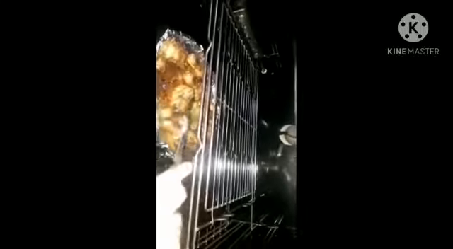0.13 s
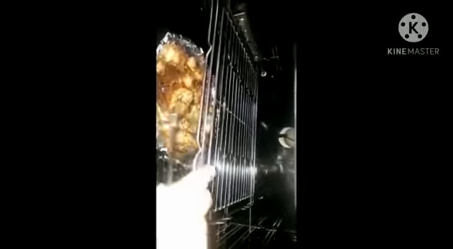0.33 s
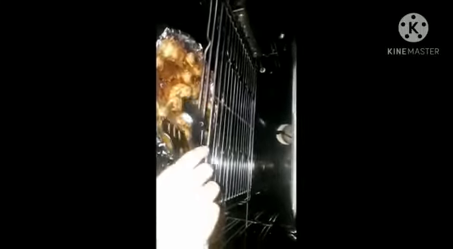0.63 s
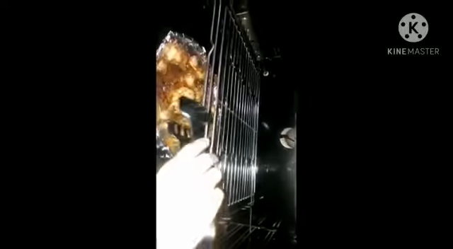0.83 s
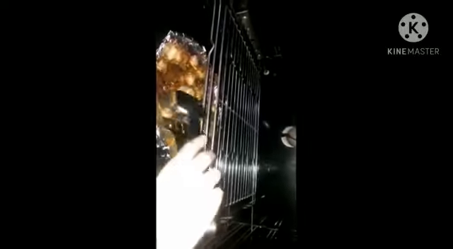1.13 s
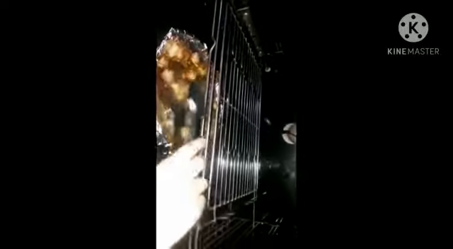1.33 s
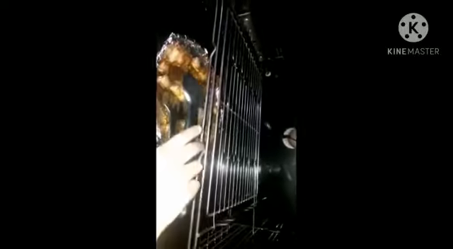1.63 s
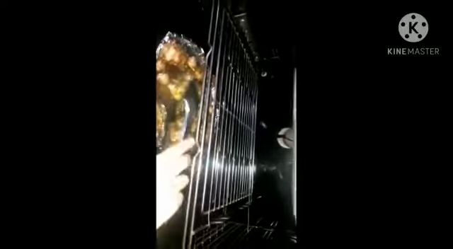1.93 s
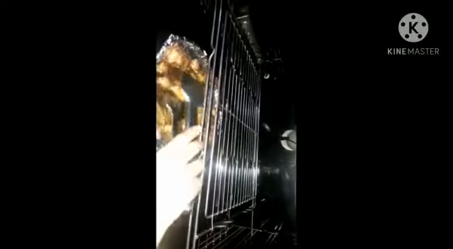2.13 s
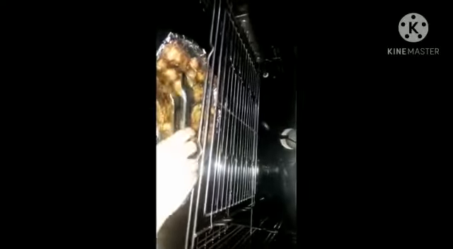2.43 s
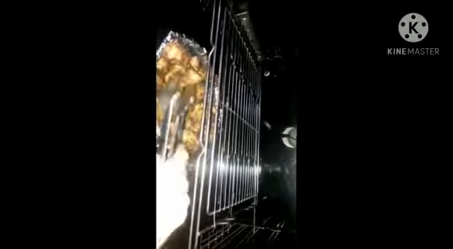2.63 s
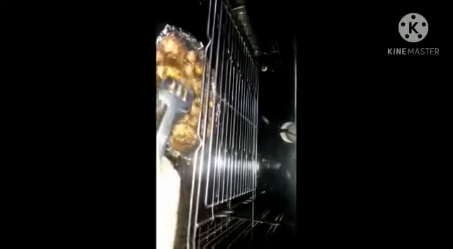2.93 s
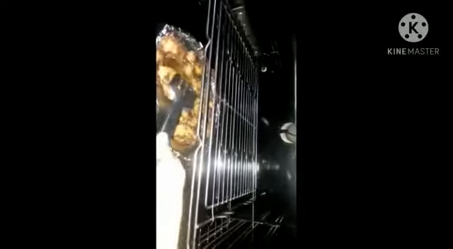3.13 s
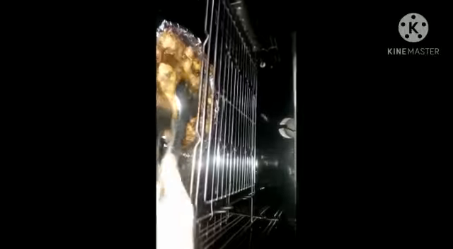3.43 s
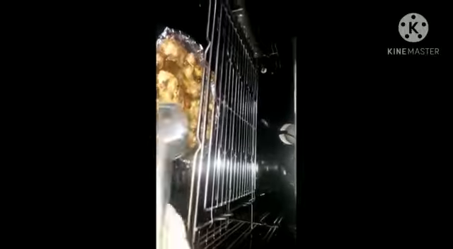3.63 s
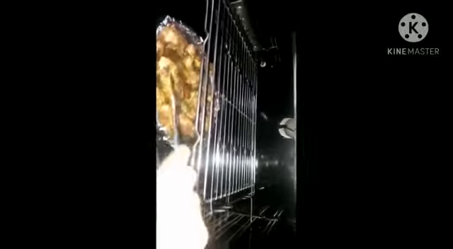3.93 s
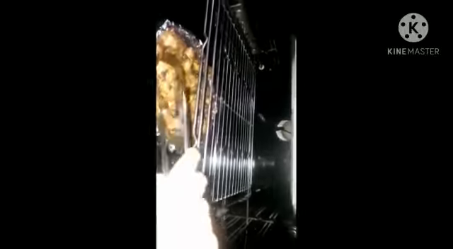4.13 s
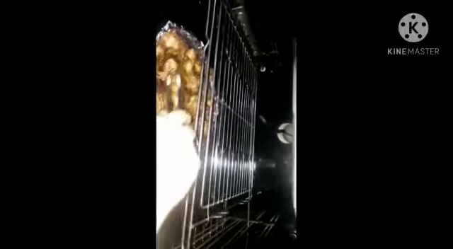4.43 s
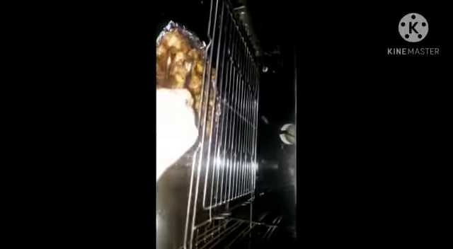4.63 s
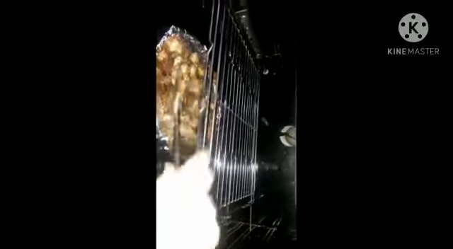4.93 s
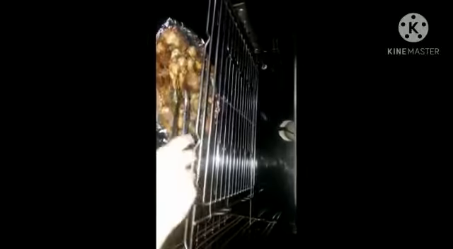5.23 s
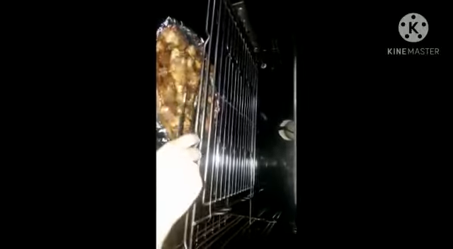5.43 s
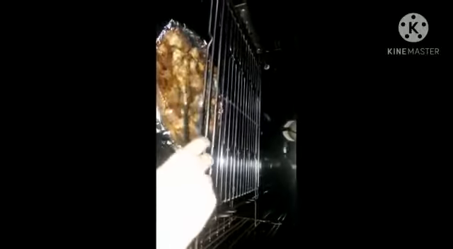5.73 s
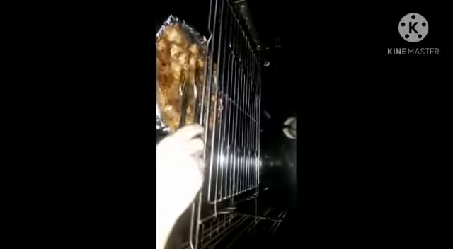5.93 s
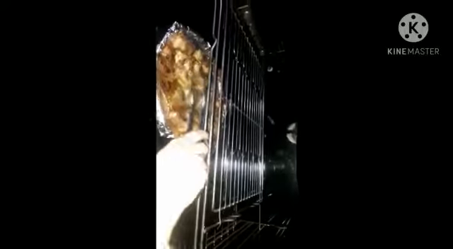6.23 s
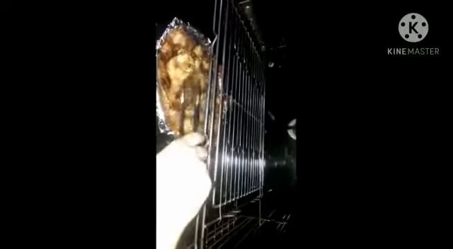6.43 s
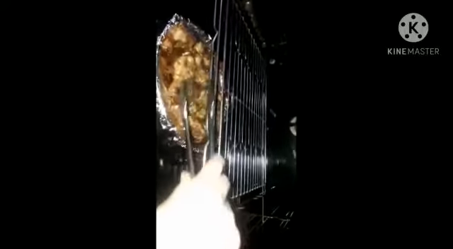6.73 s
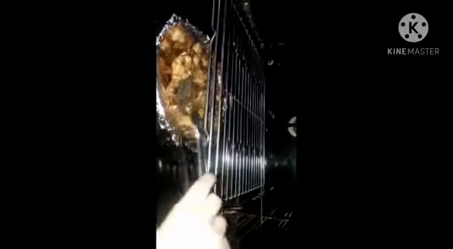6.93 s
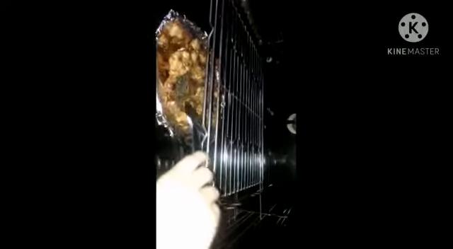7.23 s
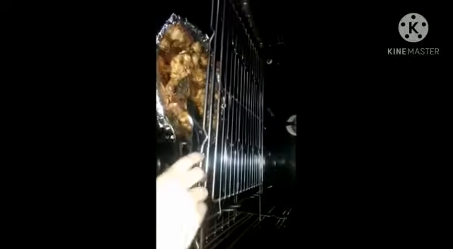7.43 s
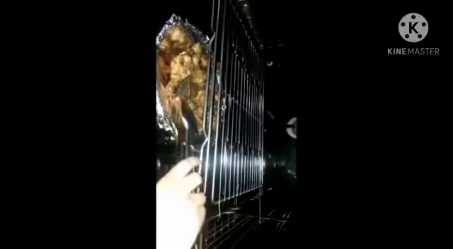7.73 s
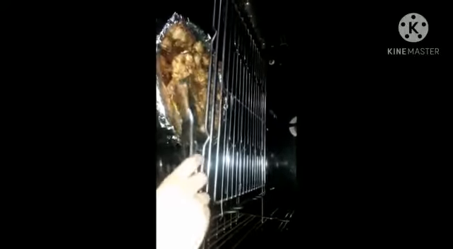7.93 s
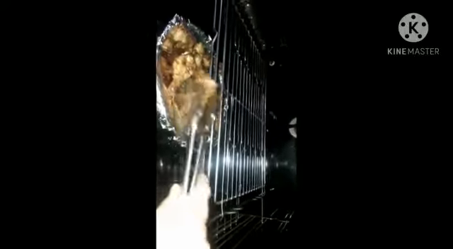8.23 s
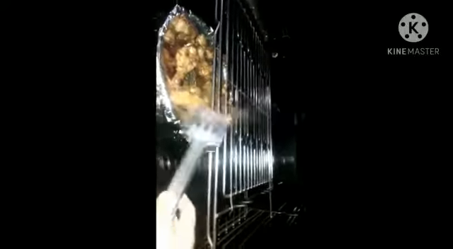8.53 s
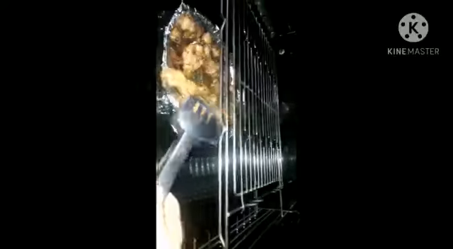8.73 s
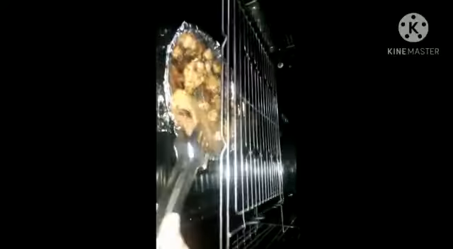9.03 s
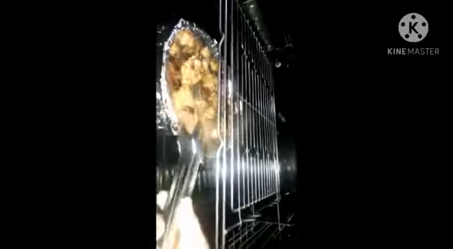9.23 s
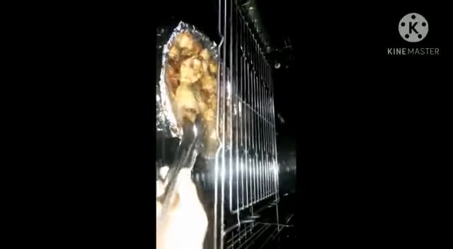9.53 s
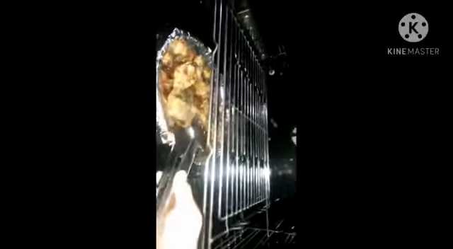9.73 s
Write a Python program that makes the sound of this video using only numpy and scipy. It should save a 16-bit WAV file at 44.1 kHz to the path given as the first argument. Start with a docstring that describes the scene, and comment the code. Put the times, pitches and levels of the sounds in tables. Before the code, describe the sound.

Steel tongs work in a foil tray on an oven rack, each strike mixing a foil crunch, a clink and a hollow boom. Light ticks open, then a cluster of clinks runs from 0.6 to 1.2 seconds, with a bright ringing hit at 1.4. Chicken pieces land with soft thumps around 2, 2.6 and 3.3 seconds. The loudest crash comes at 3.8, as the rack bangs the oven wall and the steel rings. The tray rumbles briefly, knocks at 4.7, and things go quiet until about 5.5. Ringing clinks return from 5.8 to 6.3 and near 7, followed by gritty scraping and another clink at 7.6. A sharp foil crash and clink come around 8.5, then lighter scrapes and ticks until nearly 10 seconds. The oven adds a short, dull echo, and a very faint kitchen hum lies behind.

```python
"""Tongs in a foil tray

Steel tongs turn baked chicken in a foil tray that stands on an oven rack. Each blow is a crash of foil,
a clink of the tongs and a slower boom of tray and rack; some leave tongs, bars or the oven wall ringing.
Between blows the tips scrape over the foil, pieces land with a thump and the tray shifts on the bars.
The oven adds a short echo, and a quiet kitchen hums behind."""
import sys
import numpy as np
from scipy import signal
from scipy.fft import rfft, irfft
from scipy.io import wavfile
from scipy.ndimage import uniform_filter1d

SR = 44100
rng = np.random.default_rng(int(sys.argv[2]) if len(sys.argv) > 2 else 0)


def waveform_to_disk(signal):
    """Save audio, clipped to [-1, 1], as 16-bit WAV at the path in sys.argv[1]."""
    frames = np.transpose(np.atleast_2d(signal))
    scaled = np.clip(frames, -1, 1) * 32767
    samples = np.round(scaled).astype(np.int16)
    wavfile.write(sys.argv[1], SR, samples)


N = 435266

# Blows of the tongs: t/s, crash level/dB, relative treble/dB, crash t60/s, clink level/dB, boom level/dB
BLOWS = [(0.038, -41.5, -15, 0.08, -48.5, -54), (0.0642, -43.5, -2, 0.1, -67, -72),
         (0.1336, -47, -1, 0.2, -57, -57), (0.1815, -40, -12, 0.19, -60, -87),
         (0.585, -35, -2, 0.38, -32.5, -37), (0.6656, -38.5, 1, 0.33, -34, -39),
         (0.7778, -34, -4, 0.42, -38, -35.5), (0.875, -42.5, 6.5, 0.21, -38.5, -43),
         (1.004, -50, -28, 0.84, -46.5, -44), (1.048, -48, 6, 0.12, -55, -74),
         (1.0608, -25.5, -9, 0.12, -44, -42), (1.118, -43, 0, 0.08, -55, -70),
         (1.2154, -37.5, 2, 0.16, -42, -66), (1.369, -42.5, 0, 0.2, -64, -53),
         (1.3954, -28.5, 6, 0.5, -21, -31), (1.604, -45, 7, 0.58, -58, -46.5),
         (1.8216, -36, 6.5, 0.33, -59.5, -41.5), (1.9375, -44, -1, 0.4, -64, -38.5),
         (2.097, -35, -1, 0.3, -54, -46.5), (2.2797, -36, 1.5, 0.24, -34.5, -37.5),
         (2.5344, -62, 16.5, 0.083, -68, -78), (2.652, -53.5, -18, 0.36, -70, -50.5),
         (2.845, -51, 15, 0.11, -54, -81), (2.917, -40.5, -25, 0.08, -77, -51),
         (3.052, -53.5, -3, 0.78, -69, -61), (3.1577, -49, -6, 0.26, -53, -70),
         (3.311, -51.5, 1.5, 0.55, -53, -89), (3.3557, -27.5, 7.5, 0.22, -45, -39.5),
         (3.4183, -25, -14, 0.088, -41, -37.5), (3.6158, -35, 5, 0.11, -62, -80),
         (3.655, -49, -4, 0.086, -59, -80), (3.7834, -14, 0.5, 0.47, -17.5, -23),
         (3.892, -31, 6, 0.27, -26.5, -27.5), (3.9634, -37.5, 13.5, 0.29, -48, -83),
         (4.0502, -62.5, 28, 0.097, -60.5, -63), (4.456, -56.5, 8.5, 0.44, -75.5, -63),
         (4.599, -51, -7, 0.07, -70, -77), (4.66, -47, 8, 0.086, -72, -68.5),
         (4.7185, -42.5, -15, 0.17, -68, -39), (4.73, -34.5, 4, 0.26, -55, -46.5),
         (4.873, -62.5, 7.5, 0.083, -77.5, -79.5), (5.405, -57.5, -6, 0.12, -81, -69.5),
         (5.604, -54.5, 13.5, 0.18, -75.5, -57.5), (5.669, -44.5, -10, 0.057, -68.5, -85),
         (5.7891, -30, 12, 0.26, -24, -32.5), (5.9983, -41.5, 15, 0.27, -35, -41.5),
         (6.169, -49.5, 17.5, 0.59, -41, -50.5), (6.322, -35, -0.5, 0.23, -35, -40),
         (6.47, -47, -9, 0.39, -73, -60), (6.404, -53.5, 10.5, 0.14, -53, -75),
         (6.546, -51, 14, 0.13, -68, -76), (6.579, -44, -11.5, 0.14, -63, -51.5),
         (6.6308, -44.5, -7, 0.13, -66, -77.5), (6.9511, -27, 3.5, 0.51, -33, -27.5),
         (7.0462, -26.5, -12, 0.036, -39, -57), (7.1034, -44, 2, 0.13, -48, -52),
         (7.1268, -45.5, 15, 0.13, -45, -70), (7.1548, -50, 14, 0.08, -50, -70),
         (7.1876, -46, 14, 0.048, -53, -52.5), (7.4877, -36.5, 1, 0.25, -46, -74),
         (7.588, -34.5, 9, 0.032, -49, -84), (7.5895, -43, 2, 0.095, -28.5, -44),
         (8.0003, -41.5, -3.5, 0.092, -66, -75.5), (8.4454, -42.5, -7, 0.14, -68.5, -49.5),
         (8.4957, -20, 1, 0.066, -29.5, -91), (8.609, -29.5, 11, 0.025, -68, -73.5),
         (8.609, -35, 7, 0.35, -38.5, -38), (9.24, -43.5, -18.5, 0.077, -69.5, -67.5),
         (9.251, -38, -15, 0.07, -74, -60), (9.341, -57, -14, 0.44, -55, -76),
         (9.854, -49, 6, 0.26, -61, -65)]
# Spectrum of crashing foil: f/Hz, relative level/dB
CRASH_SPECTRUM = [(530, -36.5), (1150, -16), (1990, -6), (2330, -4.5), (3150, -5), (3880, -4), (4380, -6),
                  (7390, 3.5), (15300, -18), (16500, -37)]
def foil_crashes():
    """Impact noise: struck foil gives a sharp tick, then a broad band that decays faster in the treble."""
    at, db, treble_db, t60, *_ = np.transpose(BLOWS)
    t60 = np.maximum(t60, 0.03)
    treble_t60 = 0.74 * t60
    rise_share = 0.0081  # a longer crash also swells more slowly
    foil = coloured(crease_noise(grain_db=0.5, per_s=410), CRASH_SPECTRUM)
    low, high = map(unit_rms, split(patchy(foil, depth_db=4.26, size=1024), hz=4400))
    body = low * envelope(at, db, rise_share * t60, t60, curve=0.94)
    treble = high * envelope(at, db + treble_db, rise_share * treble_t60, treble_t60, curve=0.8)
    tick = foil * envelope(at, db - 4.5, rise_s=0.0002, t60=0.022)
    return body + treble + tick


# Modes of one arm of the tongs: f/Hz, relative level/dB, free t60/s
TONG_MODES = [(2310, -6, 0.096), (3790, -10.5, 0.19), (4635, -4.5, 0.11), (4970, -10, 0.19),
              (5410, -9, 0.071), (6970, -8, 0.17), (7550, -8, 0.23), (7980, -13, 0.11), (8480, -8.5, 0.19),
              (10800, -15, 0.08), (11540, -15, 0.076)]
# Blows that also excite the lowest bending mode: t/s, level/dB
TONG_BENDS = [(.5856, -37.5), (.6656, -37), (.7775, -37), (.9, -40), (1.01, -35), (1.3962, -28),
              (2.2794, -47), (3.7839, -30.5), (3.8924, -34), (5.7893, -36), (5.9993, -41), (6.168, -44.5),
              (6.34, -33.5), (6.9514, -32), (7.605, -34.5), (8.625, -38)]
def tong_clinks():
    """Free vibration of two unequal arms: grip and point of impact shift, weight and damp each mode."""
    modes, bending = np.zeros((2 * len(TONG_MODES), N)), np.zeros(N)
    scatter = rng.standard_normal((len(BLOWS), len(modes), 3))
    for (at, _, _, crash_t60, clink_db, _), draws in zip(BLOWS, scatter):
        # Tongs that stay pressed down stop the crash early and damp their own ring.
        freedom = min(crash_t60 / 0.25, 1) ** 0.62
        for mode, (hz, db, t60), (shift, weight, stretch) in zip(modes, TONG_MODES * 2, draws):
            mode_db = clink_db + db - 5 + 4 * weight
            mode_t60 = t60 * freedom * np.exp(0.25 * stretch)
            add_mode(mode, at, hz * (1 + 0.008 * shift), mode_db, mode_t60, rise_s=0.001)
    for at, db in TONG_BENDS:
        add_mode(bending, at, hz=866, db=db, t60=0.27, rise_s=0.013)
    arms = (modes * rattle(count=len(modes), smoothing=3)).sum(0)
    return arms + bending * rattle(count=1, smoothing=12)[0]


# Spectrum of the booming tray: f/Hz, relative level/dB
BOOM_SPECTRUM = [(76, -46.5), (130, -14.5), (190, -14.5), (270, -3.5), (560, -3.5), (735, -7), (1040, -6.5),
                 (1190, -7), (1280, -4.5), (2500, -14.5), (3250, -37), (5500, -120)]
# Modes of rack and tray: f/Hz, gain/dB, t60/s
RACK_MODES = [(130, -1, 0.038), (254, -13.5, 0.4), (286, -14.5, 0.35), (334, -11, 0.6), (439.4, -11, 0.14),
              (553.4, -8, 0.1), (620, -9.5, 0.2), (709, -7.5, 0.18), (840, -9.5, 0.11), (899, 2.5, 0.056),
              (1021, -4.5, 0.24), (1333, -10, 0.11)]
def tray_booms():
    """Resonant build-up: the tray swells for some 10 ms after a blow and drives the low modes."""
    at, *_, db = np.transpose(BLOWS)
    hollow = patchy(coloured(rng.standard_normal(N), BOOM_SPECTRUM), depth_db=4, size=2048)
    boom = hollow * envelope(at, db, rise_s=0.0091, t60=0.44)
    return boom + gain_of(-43.5) * resonate([boom] * len(RACK_MODES), RACK_MODES)


# Single rings of tongs, bars and panels: f/Hz, t60/s, blows that excite each as (t/s, level/dB)
STEEL_RINGS = [(116.7, 0.34, [(.6, -47.5), (1.06, -47), (1.4, -41), (6.34, -44.5), (8.62, -49.5)]),
               (285, 1.3, [(3.8, -36), (4.06, -45)]), (450, .9, [(1.43, -46)]),
               (525, 0.62, [(4.785, -43.5)]), (557, .2, [(3.38, -33)]), (632, 0.92, [(4.75, -61.5),
               (6.01, -50.5)]), (674, 1.34, [(1.45, -49), (7.61, -54.5)]), (821, 0.15, [(3.9, -31),
               (4.725, -33)]), (936, .58, [(3.79, -29.5)]), (1041, 0.1, [(4.725, -29)]),
               (1355, 0.96, [(5.8, -49.5), (7.62, -54)]), (2100, 0.052, [(5.999, -33), (7.589, -23),
               (8.609, -27)]), (2272, 0.44, [(.7, -40), (1.4, -28)]), (2286, 0.19, [(5.8, -37),
               (6.33, -33.5)]), (2900, 0.16, [(1.7, -40)]), (3690, 0.5, [(5.791, -37.5), (6.0, -54)]),
               (12200, 0.77, [(5.8, -64), (6.0, -72)]), (8600, .25, [(.48, -61)])]
def ringing_steel():
    """Amplitude modulation: loose contact makes each single ring of the steel waver, high ones faster."""
    out = np.zeros(N)
    for hz, t60, blows in STEEL_RINGS:
        ring = np.zeros(N)
        for at, db in blows:
            add_mode(ring, at, hz, db, t60, rise_s=0.0032)
        out += ring * rattle(count=1, smoothing=round(2 + 3000 / hz))[0]
    return out


# Modes of the oven wall: f/Hz, relative level/dB
WALL_MODES = [(1303, -6), (1798, -2), (1916, -2.5), (2195, 0.5), (2400, 2.5), (3130, -1), (3446, 0),
              (3524, -3), (3680, -3), (6218, -1.5), (7380, 1), (8156, -3.5)]
def wall_clangs():
    """Modal superposition: the rack bangs the oven wall, hard then faintly, and many close modes ring."""
    out = np.zeros(N)
    for at, bang_db in [(3.786, -24), (3.894, -59)]:
        for hz, db in WALL_MODES:
            add_mode(out, at, hz, bang_db + db, t60=0.4, rise_s=0.003)
    return out


# Strokes of the tips: peak t/s, level/dB, 20 dB swell/s, 20 dB fade/s, relative treble/dB
STROKES = [(.155, -43.5, 0.2, 0.05, -8.5), (0.198, -35, 0.02, 0.0138, -1.5), (.49, -62, .4, .15, -4),
           (1.16, -45, .2, .13, -4), (.83, -44, 0.24, 0.5, -15), (1.55, -52, -0.08, 0.62, 1.5),
           (2.37, -47.5, 0.24, 0.23, -3.5), (3.481, -62.5, 0.64, -0.16, -2), (3.612, -42, 0.2, -0.15, 2.5),
           (3.982, -37.5, 0.15, -0.0462, 5), (4.12, -57.5, -1.1, 0.9, -7), (4.49, -64.5, 0.07, 0.4, 6),
           (5.735, -61.5, 0.42, -0.1, -5.5), (6.214, -50.5, 0.0148, 0.1, 11),
           (6.66, -46.5, 0.38, 0.06, -10), (7.13, -47, 0, 0.33, 3), (7.3, -43, 0.14, 0.2, -2.5),
           (7.4, -42.5, 0.1, 0.06, 5), (7.53, -51.5, 0.13, 0.19, 1.5), (7.74, -46.5, 0.22, 0.16, -2),
           (7.82, -56, 0.7, 0, -8.5), (9.235, -57, .012, .6, 1), (9.36, -48, .035, .15, -4.5),
           (9.471, -44, 0.19, 0.09, 0), (9.631, -41.5, 0.1449, 0.07, 3), (9.707, -34, 0.07, 0.06, -3),
           (9.87, -58, 1.04, .1, -5.5)]
# Spectrum of scraped foil: f/Hz, relative level/dB
SCRAPE_SPECTRUM = [(290, -38.5), (500, -11), (898, -6.5), (1190, -6.5), (1590, 0), (3110, -4), (3500, -2.5),
                   (8300, -4), (9600, -15), (15300, -16), (16500, -41)]
def tip_scrapes():
    """Sliding friction: gritty noise follows the pressure on the foil and faintly rings the tongs."""
    grit = coloured(crease_noise(grain_db=0.94, per_s=900), SCRAPE_SPECTRUM)
    low, high = split(patchy(grit, depth_db=4, size=1024), hz=4000)
    t = np.arange(0, N, 64) / SR
    low_gain, high_gain = np.zeros((2, len(t)))
    for at, db, swell_s, fade_s, treble_db in STROKES:
        flank_s = np.maximum(np.where(t < at, swell_s, fade_s), 0.01)
        stroke = gain_of(db - 20 * (abs(t - at) / flank_s) ** 1.34)  # the power rounds the peak
        low_gain += stroke
        high_gain += stroke * gain_of(treble_db)
    friction = low * per_sample(t, low_gain) + high * per_sample(t, high_gain)
    return friction + gain_of(-42.5) * resonate([friction] * len(TONG_MODES), TONG_MODES)


# Pieces of chicken dropped back into the tray: t/s, level/dB, t60/s
LANDINGS = [(1.952, -31.5, 0.35), (2.647, -35, 0.27), (3.338, -38.5, 1), (5.579, -46.5, 0.28),
            (6.601, -38.5, 0.15)]
def chicken_thumps():
    """Soft impact: a yielding piece lands with a slow swell of low noise."""
    at, db, t60 = np.transpose(LANDINGS)
    spectrum = [(150, -17), (300, 3.5), (600, -3), (1300, -13.5), (2200, -39)]
    return coloured(rng.standard_normal(N), spectrum) * envelope(at, db, rise_s=0.0076, t60=t60)


# Tray pushed about on the rack: t/s, rumble level/dB, buzz level/dB
TRAY_SHIFTS = [(0.0, -80, -76), (0.6, -68, -80), (0.79, -52, -59.5), (1.13, -52, -64.5), (2.23, -55.5, -68),
               (2.75, -63, -73), (3.38, -61.5, -80.5), (3.5, -49, -61.5), (3.8, -57.5, -72.5),
               (3.98, -44, -63), (4.32, -59.5, -69), (5.5, -74.5, -80.5), (5.99, -55, -70.5),
               (6.51, -54, -56), (6.9, -67, -80), (7.15, -52.5, -53), (8.58, -76.5, -88),
               (8.65, -47.5, -59), (9.15, -67.5, -77.5), (9.57, -62, -67.5), (9.87, -69, -73)]
# Spectrum of the sliding tray: f/Hz, relative level/dB
RUMBLE_SPECTRUM = [(35, -29), (65, -14.5), (120, -3), (280, 1), (500, -8.5), (1000, -17.5), (2500, -50.5)]
def sliding_tray():
    """Forced vibration: the pushed tray rumbles, and the bars under it buzz at their own pitches."""
    at, rumble_db, buzz_db = np.transpose(TRAY_SHIFTS)
    rumble_gain, buzz_gain = gain_of(per_sample(at, rumble_db)), gain_of(per_sample(at, buzz_db))
    rumble_noise, buzz_noise = rng.standard_normal((2, N))
    rumble = coloured(rumble_noise, RUMBLE_SPECTRUM) * rumble_gain
    buzz = coloured(buzz_noise, [(400, -33.5), (700, -0.5), (1200, 1), (2000, -21)]) * buzz_gain
    drives = [buzz_noise * buzz_gain if hz > 650 else rumble_noise * rumble_gain for hz, *_ in RACK_MODES]
    return rumble + buzz + gain_of(-30.5) * resonate(drives, RACK_MODES)


def oven_echo(x, t60):
    """Reverberation: the steel cavity and the room return a dull, decaying tail after 4 ms."""
    t = np.arange(SR // 2) / SR
    dull, _ = split(rng.standard_normal(len(t)), hz=4500)
    tail = dull * gain_of(-60 * t / t60) * (t > 0.004)
    return signal.fftconvolve(x, tail / np.linalg.norm(tail))[:N]


# Spectrum of the kitchen air: f/Hz, relative level/dB
KITCHEN_SPECTRUM = [(24, -37), (40, -10), (228, 8), (578, -25.5), (624, -2.5), (744, -19.5), (844, -8.5),
                    (1090, -24.5), (1260, -13), (2140, -15.5), (3640, -19), (14900, -28.5), (16500, -38)]
def kitchen():
    """Stationary noise: the room hisses, and a narrow resonance at 124 Hz gives a wavering hum."""
    air = coloured(rng.standard_normal(N), KITCHEN_SPECTRUM)
    hum = unit_rms(resonate([air], [(124, 0, 0.17)]))
    return air + gain_of(-8.5) * hum


def crease_noise(grain_db, per_s):
    """Shot noise: creases of foil snap at random, each briefly raising the level of a hiss."""
    snaps = gain_of(grain_db * np.minimum(rng.exponential(1, N), 4)) * (rng.random(N) < per_s / SR)
    return rng.standard_normal(N) * (1 + signal.lfilter([1], [1, -0.97], snaps))


def patchy(x, depth_db, size):
    """Shifting resonances of crumpled foil: peaks come and go, thinner and longer at a larger size."""
    frames = dict(nperseg=size, noverlap=size * 3 // 4)
    spectra = signal.stft(x, **frames)[2]
    patches = uniform_filter1d(rng.standard_normal(spectra.shape), size=2, axis=0)
    patches = unit_rms(uniform_filter1d(patches, size=10, axis=1))
    return unit_rms(signal.istft(spectra * gain_of(depth_db * patches), **frames)[1][:N])


def rattle(count, smoothing, depth_db=3.5):
    """Random modulation by a loose contact: rows of gain that waver more slowly with more smoothing."""
    noise = rng.standard_normal((count, N // 64 + 1))
    wavers = uniform_filter1d(uniform_filter1d(noise, smoothing), smoothing)
    t = np.arange(noise.shape[1]) * 64 / SR
    return [per_sample(t, gain_of(depth_db * unit_rms(row))) for row in wavers]


def add_mode(mix, at, hz, db, t60, rise_s):
    """Damped oscillation: adds one swelling, then dying sine to the mix."""
    part = mix[round(at * SR):][:round(min(t60, 1.5) * SR)]
    t = np.arange(len(part)) / SR
    part += gain_of(db - 60 * t / t60) * (1 - np.exp(-t / rise_s)) * np.sin(2 * np.pi * hz * t)


def resonate(drives, modes):
    """Resonance: each drive excites one damped mode (f/Hz, gain/dB, t60/s)."""
    out = np.zeros(N)
    for drive, (hz, db, t60) in zip(drives, modes):
        radius, angle = 1000 ** (-1 / (t60 * SR)), 2 * np.pi * hz / SR
        feedback = [1, -2 * radius * np.cos(angle), radius ** 2]
        out += gain_of(db) * np.sin(angle) * signal.lfilter([1], feedback, drive + 1e-15)
    return out


def envelope(at, db, rise_s, t60, curve=1):
    """Superposed rises and decays, one a blow; a curve below 1 drops fast at first and then lingers."""
    out = np.zeros(N)
    for start, peak_db, rise, decay in np.broadcast(at, db, rise_s, t60):
        part = out[round(start * SR):][:round(min(2 * decay, 1) * SR)]
        t = np.arange(len(part)) / SR
        part += gain_of(peak_db - 60 * (t / decay) ** curve) * (1 - np.exp(-t / rise))
    return out


def coloured(x, spectrum):
    """Spectral shaping: filters x by a curve (f/Hz, level/dB) and scales it to rms 1."""
    knot_hz, knot_db = np.transpose(spectrum)
    hz = np.fft.rfftfreq(len(x), 1 / SR)
    db = np.interp(np.log(hz + 1), np.log(knot_hz + 1), knot_db)
    return unit_rms(irfft(rfft(x) * gain_of(db), len(x)))


def split(x, hz):
    """Complementary filtering: the bass and the treble of x."""
    low = signal.sosfilt(signal.butter(2, hz, fs=SR, output="sos"), x)
    return low, x - low


def per_sample(t, values):
    """Linear interpolation of a control curve to every sample."""
    return np.interp(np.arange(N) / SR, t, values)


def unit_rms(x):
    """Normalisation to rms 1."""
    return x / np.sqrt(np.mean(x ** 2) + 1e-20)


def gain_of(db):
    """Amplitude ratio of a level in decibels."""
    return 10 ** (np.asarray(db) / 20)


def scene():
    """Superposition: direct sound, its echo in the oven and the kitchen add in one channel."""
    direct = foil_crashes() + tong_clinks() + tray_booms() + ringing_steel() + wall_clangs()
    direct += chicken_thumps() + tip_scrapes() + sliding_tray()
    echo = gain_of(-20) * oven_echo(direct, t60=0.31)
    return (direct + echo + gain_of(-65) * kitchen())[None]


def record(dry):
    """Band limiting: a small microphone drops the deep bass, and the treble ends at 16.5 kHz."""
    thin = signal.sosfilt(signal.butter(2, 52, "high", fs=SR, output="sos"), dry)
    lowpass = signal.firwin(255, 16500, window=("kaiser", 9), fs=SR)
    return signal.oaconvolve(thin, lowpass[None], "same")


dry = scene()
out = record(dry)
waveform_to_disk(out)
```